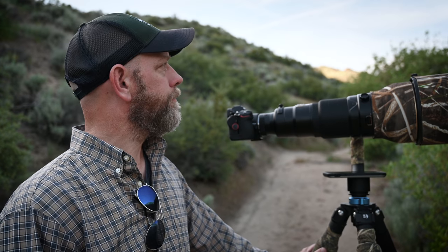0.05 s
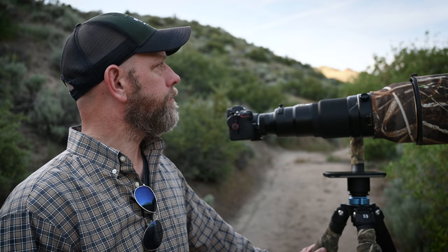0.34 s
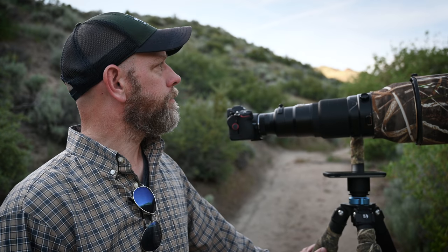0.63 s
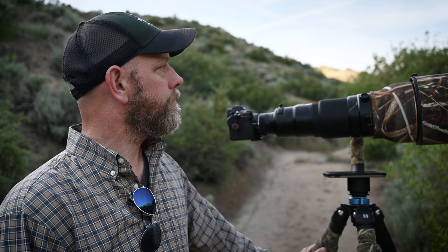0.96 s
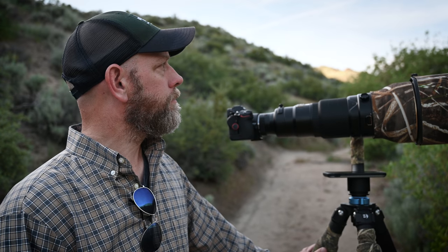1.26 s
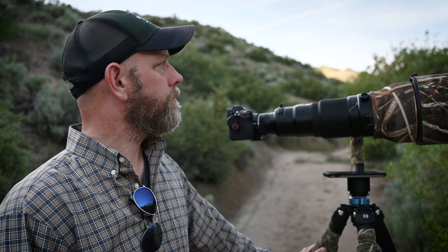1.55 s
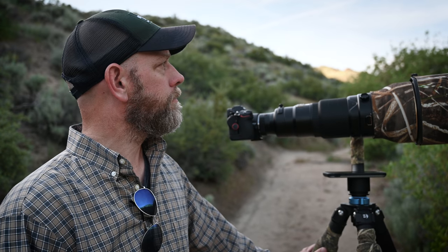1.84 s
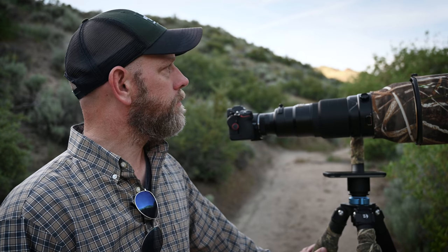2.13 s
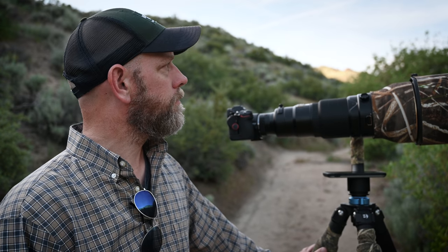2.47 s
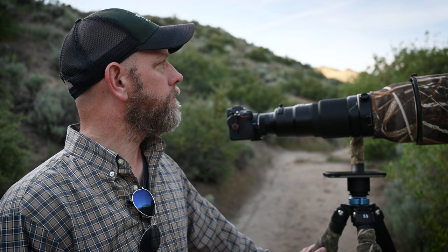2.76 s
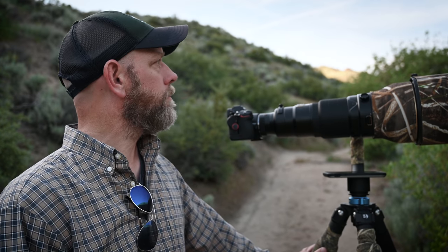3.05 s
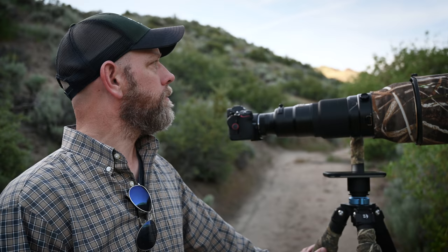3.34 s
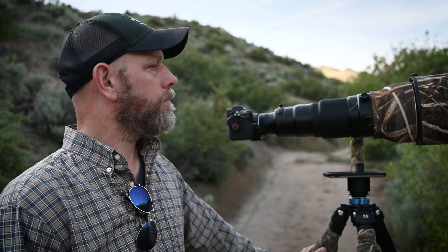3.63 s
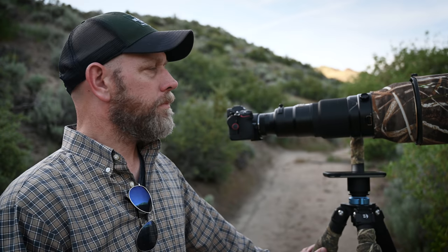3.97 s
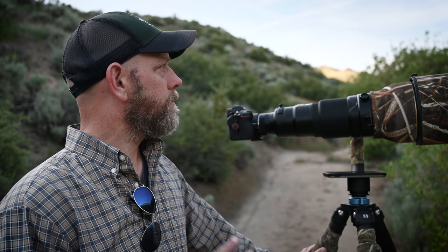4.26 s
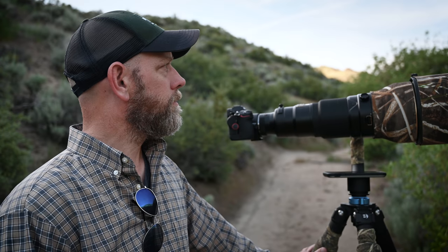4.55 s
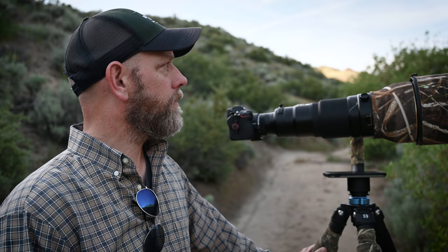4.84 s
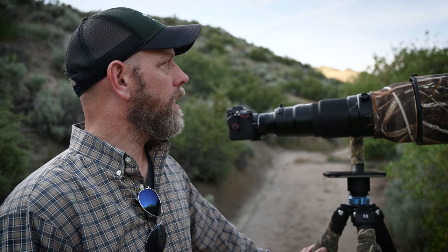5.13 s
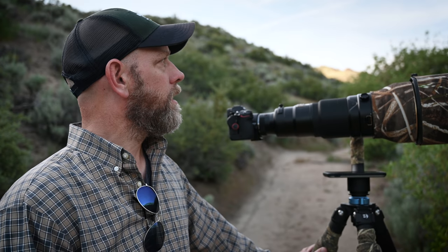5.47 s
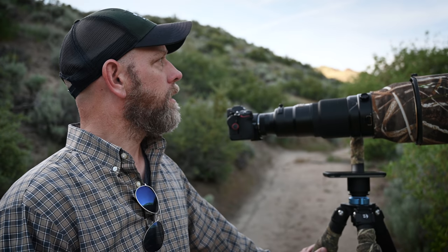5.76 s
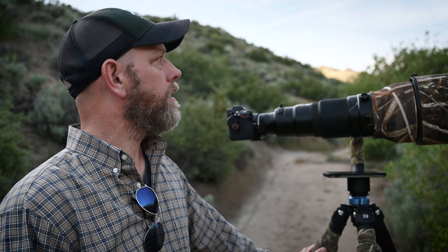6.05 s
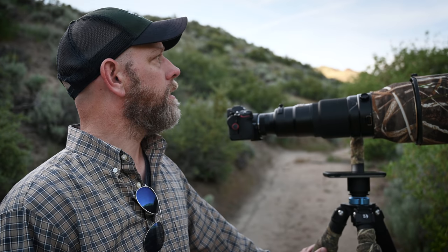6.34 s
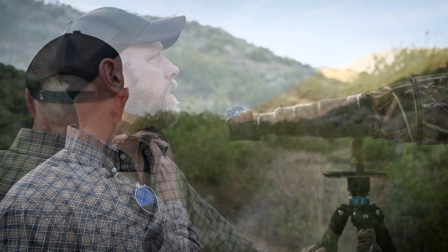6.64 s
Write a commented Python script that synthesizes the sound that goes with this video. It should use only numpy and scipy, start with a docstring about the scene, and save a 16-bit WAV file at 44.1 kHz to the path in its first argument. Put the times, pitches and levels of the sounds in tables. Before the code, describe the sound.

A close songbird starts at once with five quick, raspy rising notes, ending at about 1 second, each with a short echo off bushes and slopes. Behind it, a faint cricket chirps about three times a second, with a slower neighbour, a distant trilling chorus and a soft wash of air. Small dry ticks fall in the first second and a half and again near 3.7 seconds. A far bird gives two very faint falling calls between 1.6 and 1.9 seconds. From about 4.1 to 4.7 seconds the close bird sings three clear whistles that rise and fall. A few light ticks and scuffs follow just after 5 seconds. The background gently swells and dips, with a barely audible hum coming and going. At about 6.5 seconds the bird gives one longer, softer gliding whistle as a faint low rumble fades in.

```python
"""Songbird and crickets in shrubby hills

A close bird's syrinx gives five rasping upslurs, three arched whistles and one long whistle; bushes
and slopes scatter a short echo. Crickets scrape their wings, two near and a chorus farther off.
Behind: a distant bird, small ticks, a wash of air, a faint hum and a closing rumble. The whole scene
swells and sinks. A limiter holds the loud notes and ducks the background behind them."""
import sys
import numpy as np
from scipy import signal
from scipy.fft import rfft, irfft, next_fast_len
from scipy.io import wavfile
from scipy.ndimage import uniform_filter1d, minimum_filter1d, map_coordinates

SR = 44100
rng = np.random.default_rng(int(sys.argv[2]) if len(sys.argv) > 2 else 0)


def unload_audio(sound):
    """Save the sound as a 16-bit wav file, at the path given as the first command line argument."""
    columns = np.transpose(np.atleast_2d(sound))
    # keep every value between -1 and 1, then stretch to whole-number steps
    steps = np.round(np.clip(columns, -1, 1) * 32767)
    wavfile.write(sys.argv[1], SR, steps.astype(np.int16))


N = 299880

# Each row: time from mid-note in seconds, pitch in Hz, level in dB, side partials in dB, roughness.
UPSLUR_SHAPE = [(-.06, 1683, -39.5, -6, 0.9), (-.047, 1720, -15, -1.5, 1.2), (-.039, 1602, -8, -1.5, 1.3),
                (-.022, 1663, 0.5, -1, 0.65), (-.01, 1978, -3, 3.5, 0.54), (0, 2310, -2, 4, 0.1),
                (.01, 2566, 2.5, -11.5, 0.13), (.02, 2661, 6, -34, 0.05), (.03, 2662, 2, -49, 0.1),
                (.039, 2760, 0.5, -42.5, 0.03), (.048, 2570, -27.5, -42.5, 0.1)]
# Each row: frequency in Hz, throat gain in dB.
THROAT_RESPONSE = [(700, -42), (1050, -15.5), (1400, -21), (1800, -11), (2050, -3.5), (2300, 2.5),
                   (2600, 2), (2800, -6.5), (3100, -12), (3600, -23.5), (4500, -40), (6500, -48.5),
                   (7300, -58.5)]

def upslur(ratio, stretch, jitter=0.045):
    """The syrinx repeats only every third cycle, a rough stack of partials, then settles to a whistle."""
    hz, db, partials_db, rough = curves(UPSLUR_SHAPE, span(UPSLUR_SHAPE, stretch))
    n = len(hz)
    phase = cycle(ratio * hz * (1 + jitter * rough * wobble(231.3, n)))
    note = overtones(phase, ratio * hz) * (1 - rough) ** 4
    for multiple in np.arange(2, 14) / 3:
        level_db = along(THROAT_RESPONSE, multiple * hz) + (0 if multiple == 1 else partials_db)
        blur_rad = rough + max(multiple - 1.3, 0)  # high partials never come clean
        note += amp(level_db) * np.sin(multiple * phase + rasp(blur_rad, n, rate_hz=480))
    beak_cut = signal.butter(4, 1000, "high", fs=SR, output="sos")  # a small beak radiates no bass
    return signal.sosfilt(beak_cut, np.sqrt(2) * amp(db) * note)


# Each row: time from the top in seconds, pitch in Hz, level in dB, second voice in dB, roughness.
ARCH_SHAPE = [(-.043, 1229, -43.5, 4.5, 0.8), (-.028, 1571, -11, -6, 0.26),
              (-.015, 1744, -2.5, -16.5, 0.25), (-.003, 2107, 8, -33.5, 0), (.003, 2072, 2, -60.5, 0.14),
              (.013, 1863, 3, -46, 0), (.026, 1610, 0.5, -18, .08), (.039, 1502, -9.5, -18, 0),
              (.054, 1487, -12, -18, 0.2), (.064, 1444, -34, -33.5, 0.2)]

def arch(ratio, stretch, second_ratio=1.31):
    """A whistle rises and falls; the other side of the syrinx adds a weak rough tone above it."""
    hz, db, second_db, rough = curves(ARCH_SHAPE, span(ARCH_SHAPE, stretch))
    n = len(hz)
    phase = cycle(ratio * hz)
    note = np.sin(phase + rasp(rough, n, rate_hz=550)) + overtones(phase, ratio * hz)
    note += amp(second_db) * np.sin(second_ratio * phase + rasp(1.1, n, rate_hz=520))
    return np.sqrt(2) * amp(db) * note


# Each row: frequency in Hz, overtone level in dB.
BEAK_RESPONSE = [(3100, -30.5), (4100, -52), (5500, -48), (7200, -67), (8300, -47), (9200, -71),
                 (12000, -70.5)]

def overtones(phase, hz, flutter_rad=0.99):
    """Faint, unsteady harmonics, coloured by the resonances of the beak."""
    return sum(amp(along(BEAK_RESPONSE, k * hz))
               * np.sin(k * phase + rasp(flutter_rad, len(hz), rate_hz=860)) for k in range(2, 5))


def whistle(rows, octave_db=-39, waver=0.0028):
    """A slow clean glide with a faint octave."""
    hz, db = curves(rows, span(rows))
    phase = cycle(hz * (1 + waver * wobble(120, len(hz))))
    return np.sqrt(2) * amp(db) * (np.sin(phase) + amp(octave_db) * np.sin(2 * phase))


# Each row: centre in seconds, pitch ratio, length ratio, gain in dB.
UPSLUR_NOTES = [(-.09, 1.026, 1.08, -7.5), (0.11, 1.036, 0.99, -12), (0.305, 1.045, 1.1, -14.5),
                (0.483, 1.005, 0.96, -12.5), (0.672, 1.0, 1.04, -12.5), (.890, 0.99, 0.89, -16)]  # the first ends before time zero: only its echo sounds
ARCH_NOTES = [(4.158, 1.016, 1.1, -12.5), (4.375, 1.0, .93, -12.5), (4.597, .985, 1.1, -13.5)]
# Each row: time in seconds, pitch in Hz, level in dB.
LEAD_IN_GLIDE = [(6.51, 1300, -60), (6.53, 1427, -52.5), (6.56, 1626, -52), (6.585, 1724, -58.5)]
LONG_GLIDE = [(6.545, 1140, -54), (6.577, 1239, -48.5), (6.611, 1400, -26.5), (6.667, 1623, -20.5),
              (6.699, 1627, -21), (6.731, 1562, -20), (6.765, 1566, -24), (6.789, 1465, -27),
              (6.8, 1443, -31.5)]

def bird():
    """Two phrases each repeat one gesture at varied pitch and length; a soft note leads to a long one."""
    song = np.zeros((2, N))
    for s, ratio, stretch, db in UPSLUR_NOTES:
        add(song, s + stretch * UPSLUR_SHAPE[0][0], amp(db) * hills(upslur(ratio, stretch), wet_db=-17))
    for s, ratio, stretch, db in ARCH_NOTES:
        add(song, s + stretch * ARCH_SHAPE[0][0], amp(db) * hills(arch(ratio, stretch), wet_db=-18.5))
    for rows in (LEAD_IN_GLIDE, LONG_GLIDE):
        add(song, rows[0][0], hills(whistle(rows), wet_db=-18, bush_db=-22.5))
    return song


# Each row: time from the loudest point in seconds, pitch ratio, level in dB.
WING_STROKE = [(-.013, 1, -25), (-.007, 1.004, -6), (0, 1, 0), (.005, .975, -1), (.012, .915, -6.5),
               (.02, .865, -13), (.028, .82, -27)]

def chirp(hz, scrape_rad, period_s=0.0455, strokes=3, first_db=-2):
    """Cricket wing strokes, each a scratchy tone that falls as the closing wing slows."""
    ratio, db = curves(WING_STROKE, span(WING_STROKE))
    n = len(db)
    sound = np.zeros(int(strokes * period_s * SR) + n)
    for k in range(strokes):
        phase = cycle(hz * ratio * (1 + 0.005 * rng.normal())) + rasp(scrape_rad, n, rate_hz=390)
        stroke_db = db + first_db * (k == 0) + rng.normal()
        start = int(k * period_s * SR)
        sound[start:start + n] += amp(stroke_db) * np.sin(phase)
    return np.sqrt(2) * sound


# Each entry: first stroke of a chirp in seconds.
NEAREST_CHIRPS_S = [0.096, .412, 0.743, 1.06, 1.40, 1.768, 2.121, 2.524, 2.86, 3.304, 3.693, 4.018, 4.407,
                    4.726, 5.037, 5.375, 5.696, 6.016, 6.347, 6.682]
# Each row: time in seconds, singing level in dB.
NEAREST_EFFORT = [(0, -42), (1.5, -56), (2.5, -44.5), (3.5, -49), (5, -42.5), (6.1, -39.5), (6.8, -47)]
NEIGHBOUR_EFFORT = [(.7, -51), (2.4, -51), (3.8, -51), (5, -56)]

def near_crickets(neighbour_start_s=0.03, neighbour_period_s=0.41, jitter_s=0.01):
    """One cricket chirps about three times a second; a slower neighbour drifts in and out of step."""
    track = np.zeros((2, N))
    nearest = [(s, curves(NEAREST_EFFORT, s)[0]) for s in NEAREST_CHIRPS_S]
    neighbour = [(s + jitter_s * rng.normal(), curves(NEIGHBOUR_EFFORT, s)[0])
                 for s in np.arange(neighbour_start_s, N / SR, neighbour_period_s)]
    for s, db in nearest + neighbour:
        sound = hills(chirp(hz=4885, scrape_rad=0.23), wet_db=-20, bush_db=-17.5, bush_t60_s=0.062)
        add(track, s + WING_STROKE[0][0], amp(db) * sound)
    return track


def far_crickets(count=18, pitch_hz=4440, spread_hz=150, period_s=0.36, width=0.22, level_db=-53.5):
    """Many crickets, each at its own pitch, pace and place, blur into a steady trill."""
    chorus = np.zeros((2, N))
    for k, (detune, slowness, place) in enumerate(rng.standard_normal((count, 3))):
        voice = np.zeros(N)
        hz = pitch_hz + spread_hz * np.tanh(detune)
        for s in np.arange(-period_s * k / count, N / SR, period_s * np.exp(0.04 * slowness)):
            add(voice, s + 0.012 * rng.normal(), chirp(hz, scrape_rad=0.52))
        pan = 1 + width * np.tanh(place) * np.array([[1], [-1]])
        chorus += pan * hills(voice, wet_db=-11)[:, :N]
    return amp(level_db) * unit(chorus)


# Each row: start in seconds, starting pitch in Hz, level in dB.
FAR_CALLS = [(1.59, 3510, -59), (1.87, 3760, -62), (6.269, 3540, -63)]

def far_bird(length_s=0.075, fall=0.13):
    """Short downward glides from far up the slope."""
    track = np.zeros((2, N))
    progress = np.linspace(0, 1, int(length_s * SR))
    for s, hz, db in FAR_CALLS:
        call = np.sin(np.pi * progress) * np.sin(cycle(hz * (1 - fall * progress)))
        add(track, s, amp(db) * hills(np.sqrt(2) * call, wet_db=-5))
    return track


# Each row: start in seconds, peak level in dB, band centre in Hz, 60 dB decay time in seconds.
TICKS = [(.014, -31.5, 1360, 0.033), (.222, -36.5, 1160, 0.012), (.427, -30, 1492, 0.018),
         (1.268, -31, 1503, 0.026), (3.694, -35.5, 1470, 0.021), (5.052, -40, 13100, .004),
         (5.077, -41, 4440, .004), (5.093, -31, 4100, 0.012), (5.114, -43, 10020, 0.0045),
         (5.151, -36.5, 1110, 0.068), (5.159, -42.5, 280, .1), (5.215, -39.5, 447, .12)]

def ticks(width_octaves=0.45):
    """Dry ticks and soft scuffs: fast-dying noise bursts, each through one broad band."""
    track = np.zeros(N)
    t = np.arange(-SR // 100, SR // 10) / SR
    hz = np.fft.rfftfreq(len(t), 1 / SR) + 1
    for s, db, centre_hz, t60_s in TICKS:
        burst = rng.standard_normal(len(t)) * amp(-60 * np.abs(t) / t60_s) * (t >= 0)
        band = np.exp(-0.5 * (np.log2(hz / centre_hz) / width_octaves) ** 2)
        tick = irfft(rfft(burst) * band, len(t))
        add(track, s + t[0], amp(db) * tick / np.abs(tick).max())
    return track


# Each row: frequency in Hz, relative density in dB.
WASH_SPECTRUM = [(30, -65.5), (50, -48), (65, -34), (110, -9.5), (195, -4.5), (320, -7), (410, -5),
                 (600, -9.5), (820, -4.5), (1300, -11.5), (2000, -14), (3600, -17.5), (4700, -38),
                 (8000, -96.5)]
HISS_SPECTRUM = [(1500, -5), (3000, 1.5), (5500, 5), (7000, 2), (10000, -1.5), (15500, -9)]

def air(wash_db=-49.5, hiss_db=-60, drift_db=1.03):
    """Distant air: a low, wavering wash and a fine hiss."""
    wash = amp(wash_db + drift_db * wobble(18, N)) * rush(WASH_SPECTRUM)
    return wash + amp(hiss_db) * rush(HISS_SPECTRUM)


# Each row: start in seconds, length in seconds, level in dB.
HUM_SWELLS = [(1.543, 0.43, -58), (3.18, 0.23, -59), (4.244, 0.51, -60), (5.396, 0.23, -56),
              (5.753, 0.1, -51.5)]
# Each row: frequency in Hz, relative level in dB.
HUM_TONES = [(196, -10), (392, 0), (590, -8), (800, -5)]

def hum(waver=0.016, flutter_db=1.5, fade_s=0.055, rest_db=-68.5, murmur_db=-2):
    """Faint far tones, wavering in pitch and level, come and go with a low murmur of air."""
    t = np.arange(N) / SR
    swells = sum(amp(db) * np.clip(np.minimum(t - s, s + length_s - t) / fade_s + 0.5, 0, 1)
                 for s, length_s, db in HUM_SWELLS)
    tones = sum(amp(db + flutter_db * wobble(20, N)) * np.sin(cycle(hz * (1 + waver * wobble(30, N))))
                for hz, db in HUM_TONES)
    return (amp(rest_db) + swells) * (np.sqrt(2) * tones + amp(murmur_db) * rush(WASH_SPECTRUM))


# Each row: time in seconds, level in dB.
RUMBLE_FADE_IN = [(6.45, -84.5), (6.6, -60), (6.72, -48.5), (6.8, -49)]
# Each row: frequency in Hz, relative density in dB.
RUMBLE_SPECTRUM = [(35, -57), (55, -39), (75, -15.5), (110, -0.5), (180, -1.5), (300, -10), (450, -4),
                   (700, -42.5)]

def closing_rumble(hiss_db=-15):
    """A low rumble and a faint hiss fade in at the end."""
    db = curves(RUMBLE_FADE_IN, np.arange(N) / SR)[0]
    return amp(db) * (rush(RUMBLE_SPECTRUM) + amp(hiss_db) * rush(HISS_SPECTRUM))


# Each row: frequency in Hz, left-right correlation.
STEREO_LIKENESS = [(60, 0.8), (1000, 0.85), (3500, 0.26), (5500, 0.25), (8000, .1), (15000, .03)]

def rush(spectrum):
    """Stereo noise of rms 1, alike in the bass and unrelated in the treble."""
    def mid_side_gains(hz):
        angle = np.arccos(np.clip(along(STEREO_LIKENESS, hz), -1, 1)) / 2
        return amp(along(spectrum, hz)) * [np.cos(angle), np.sin(angle)]
    mid, side = filtered(rng.standard_normal((2, N)), mid_side_gains)
    return unit(np.array([mid + side, mid - side]))


# Each row: frequency in Hz, 60 dB decay time in seconds.
SLOPE_DECAY = [(1000, 0.25), (2000, 0.23), (2700, 0.32), (8000, 0.29)]

def hills(sound, wet_db, bush_db=-18, bush_t60_s=0.12, rise_s=0.0037, width=0.12,
          linger_db=-25, linger_t60_s=1.1):
    """A sound in stereo, with quick scatter from near bushes and a longer tail from the slopes."""
    hz, t, noise = signal.stft(rng.standard_normal((2, SR // 2)), SR, nperseg=256)
    fade = amp(-60 * t / along(SLOPE_DECAY, hz)[:, None]) + amp(linger_db - 60 * t / linger_t60_s)
    mid, side = signal.istft(noise * fade, SR, nperseg=256)[1]
    t = np.arange(len(mid)) / SR
    slopes = (mid + width * np.array([side, -side])) * (1 - np.exp(-t / rise_s))
    bushes = rng.standard_normal(len(t)) * amp(-60 * t / bush_t60_s)
    echo = amp(wet_db) * slopes / np.linalg.norm(slopes[0])
    echo += amp(bush_db) * bushes / np.linalg.norm(bushes)
    response = np.pad(echo, ((0, 0), (SR // 100, 0)))
    response[:, 0] = 1  # direct path, 10 ms ahead of the echo
    return signal.fftconvolve(sound[None], response, axes=1)


# Each row: time in seconds, gain in dB.
OVERALL_GAIN = [(0, 0), (.97, -0.5), (1.03, -10), (1.56, -9.5), (1.585, -0.5), (1.9, -0.5), (1.95, -3.5),
                (2.15, -1), (2.4, -5), (2.6, 0.5), (3.05, -1.5), (3.35, 2.5), (3.6, -.5), (4.3, 3),
                (4.8, 3.5), (5.85, 0), (6.2, -0.5), (6.8, 2.5)]
# Each row: centre in seconds, depth in dB, half width in seconds.
GAIN_DIPS = [(.81, 6, 0.024), (1.547, 15.5, .012), (2.041, 4, 0.035), (2.79, 8.5, 0.079),
             (3.662, 3.5, 0.022), (3.99, 6, 0.063), (4.929, 3.5, 0.081), (5.291, 4, 0.027),
             (5.99, 5.5, 0.016), (6.51, 7, 0.035)]

def swell(flutter_db=1.0):
    """Everything swells and sinks together, with brief dips."""
    t = np.arange(N) / SR
    dips_db = sum(db * np.exp(-((t - s) / half_s) ** 2) for s, db, half_s in GAIN_DIPS)
    return amp(curves(OVERALL_GAIN, t)[0] - dips_db + flutter_db * wobble(16, N))


def amp(db):
    """Decibels to gain."""
    return 10 ** (np.asarray(db) / 20)


def unit(x):
    """Scaled to rms 1."""
    return x / np.sqrt(np.mean(x ** 2) + 1e-20)


def along(points, hz):
    """(Hz, value) points, read on a log axis."""
    knots_hz, values = np.transpose(points)
    return np.interp(np.log(hz + 1), np.log(knots_hz), values)


def curves(rows, t):
    """Each column after the time, read at times t."""
    s, *columns = np.transpose(rows)
    return [np.interp(t, s, column) for column in columns]


def span(rows, stretch=1):
    """Sample times from the first row to the last, played stretch times as slowly."""
    return np.arange(rows[0][0], rows[-1][0], 1 / (SR * stretch))


def wobble(rate_hz, n):
    """A smooth random curve, rate_hz knots a second."""
    knots = rng.standard_normal(int(n * rate_hz / SR) + 4)
    return map_coordinates(knots, [np.arange(n) * rate_hz / SR])


def rasp(depth_rad, n, rate_hz):
    """Random phase of an irregular vibration."""
    return depth_rad * wobble(rate_hz, n)


def cycle(hz):
    """Running phase of a moving pitch."""
    return 2 * np.pi * np.cumsum(hz) / SR


def add(track, s, sound):
    """Mix a sound in from time s, cut to the track."""
    start = round(s * SR)
    lo, hi = max(start, 0), min(start + sound.shape[-1], N)
    if hi > lo:
        track[..., lo:hi] += sound[..., lo - start:hi - start]


def filtered(x, response):
    """x through a gain that is a function of Hz."""
    size = next_fast_len(N + SR // 4)
    return irfft(rfft(x, size) * response(np.fft.rfftfreq(size, 1 / SR)), size)[..., :N]


def scene():
    """The bird and the near crickets are straight ahead; chorus and air lie all around."""
    return swell() * (bird() + near_crickets() + far_crickets() + far_bird()
                      + ticks() + air() + hum() + closing_rumble())


def record(dry, ceiling=0.4, hold_s=0.008, release_db_per_s=90, top_hz=15720):
    """A limiter holds the loudest notes and ducks the background as it recovers; a low-pass follows."""
    hold = int(hold_s * SR)
    peak = np.abs(dry).max(0) + 1e-9
    need_db = 20 * np.log10(np.minimum(1, ceiling / peak))
    recovery_db = release_db_per_s * np.arange(N) / SR
    gain_db = np.minimum.accumulate(minimum_filter1d(need_db, hold) - recovery_db) + recovery_db
    limited = dry * amp(uniform_filter1d(gain_db, hold))
    return filtered(limited, lambda hz: hz < top_hz)


dry = scene()
out = record(dry)
unload_audio(out)
```